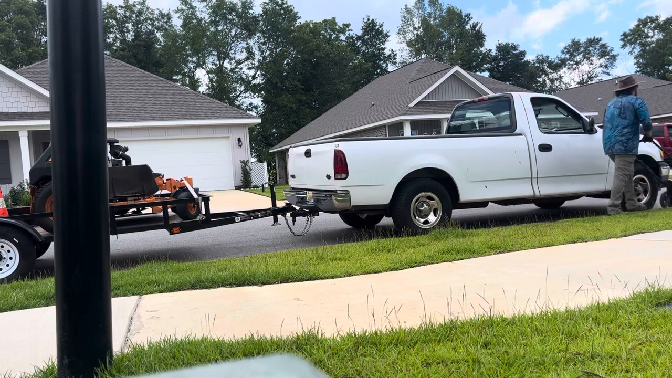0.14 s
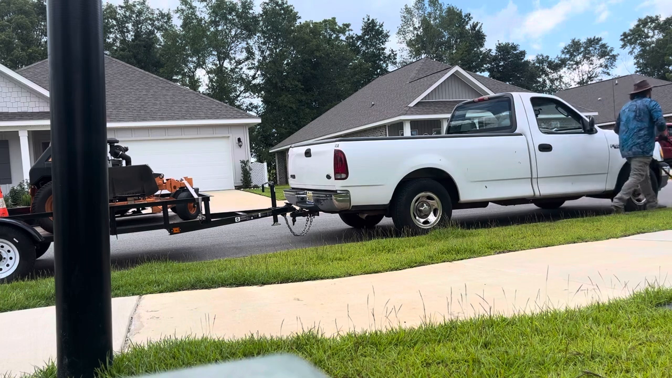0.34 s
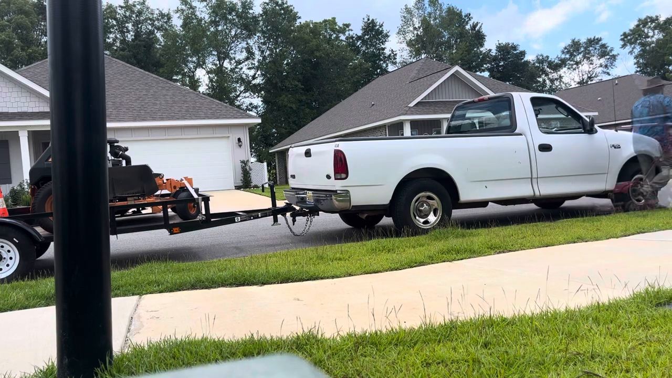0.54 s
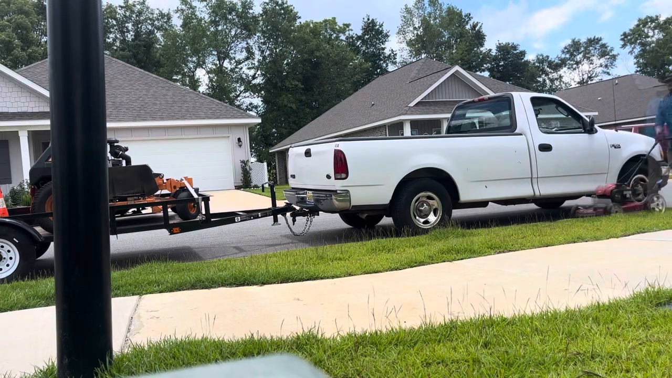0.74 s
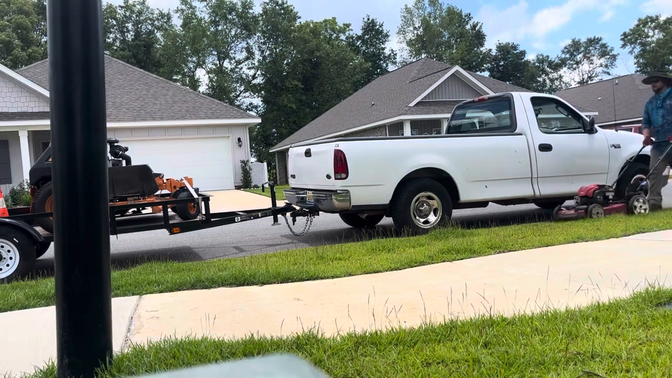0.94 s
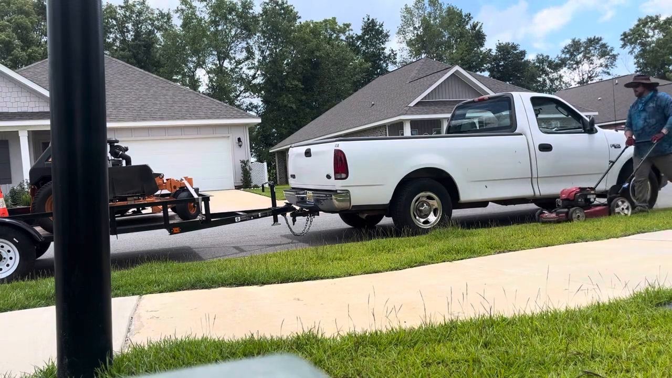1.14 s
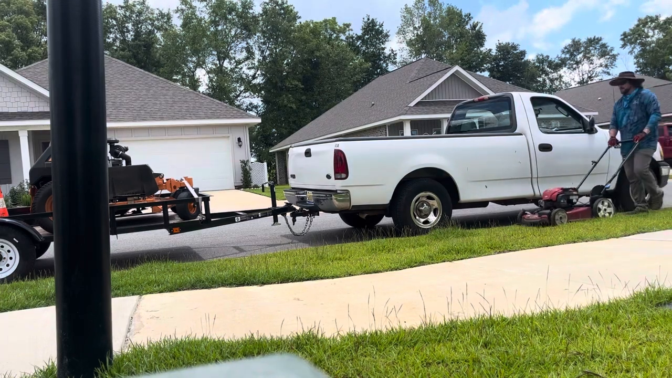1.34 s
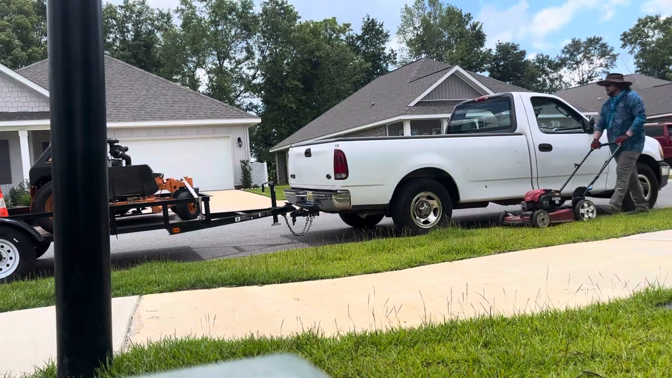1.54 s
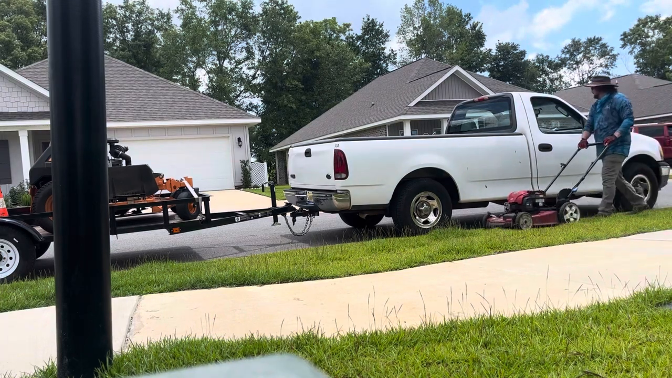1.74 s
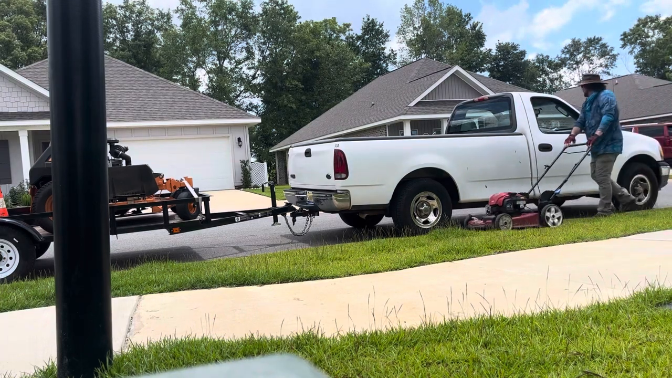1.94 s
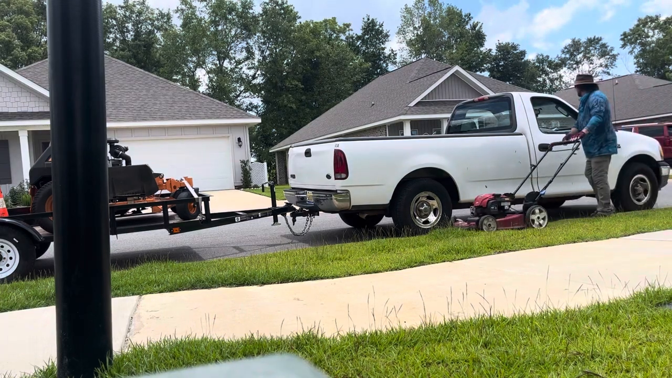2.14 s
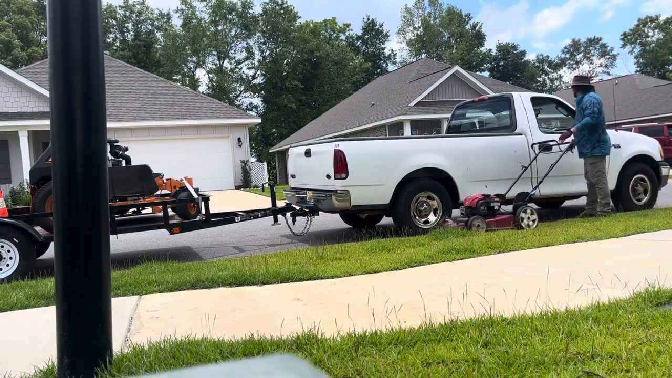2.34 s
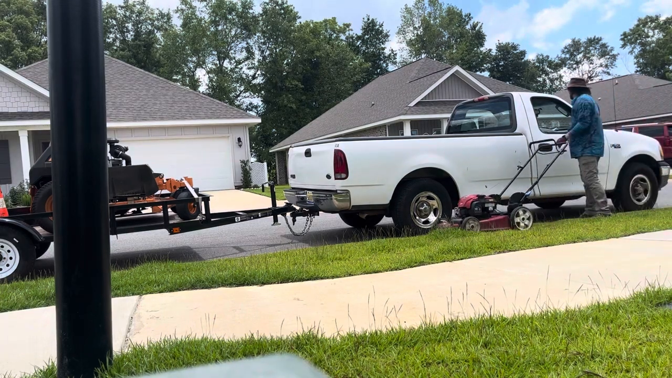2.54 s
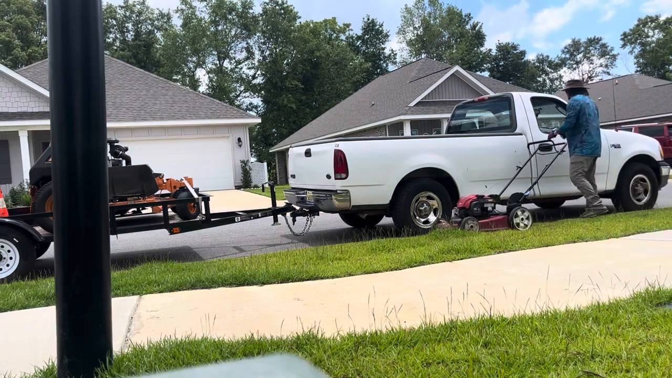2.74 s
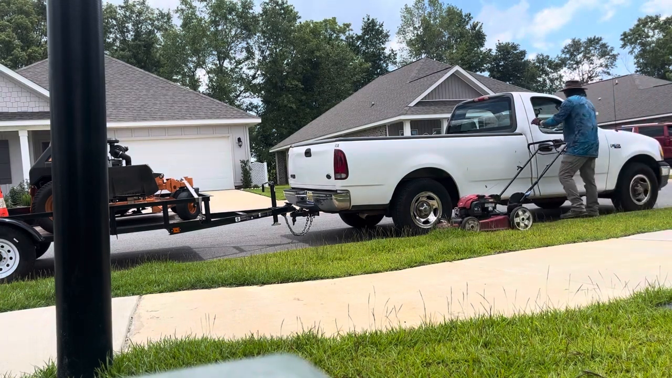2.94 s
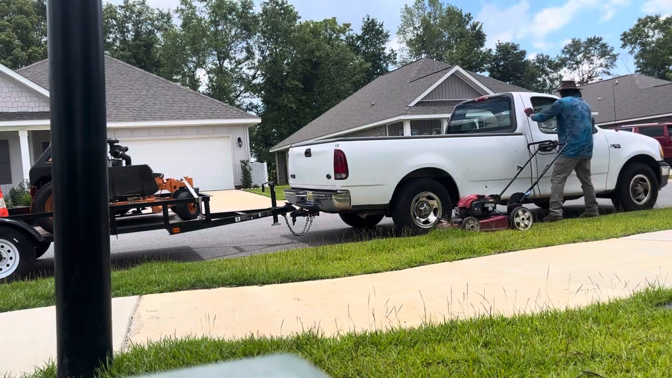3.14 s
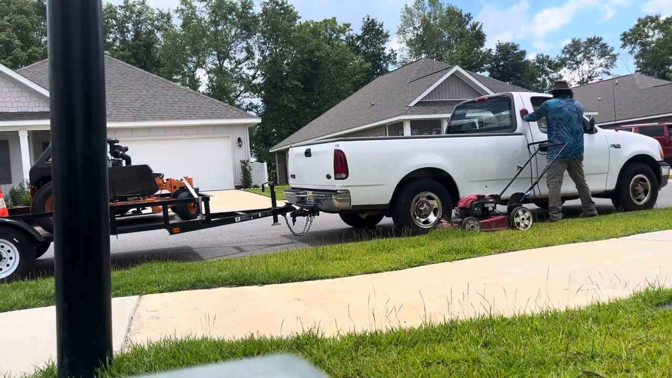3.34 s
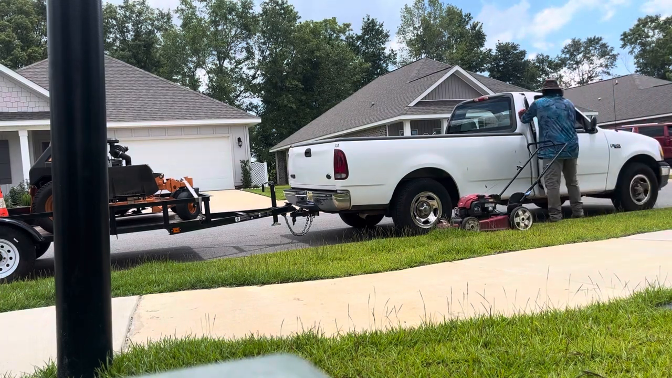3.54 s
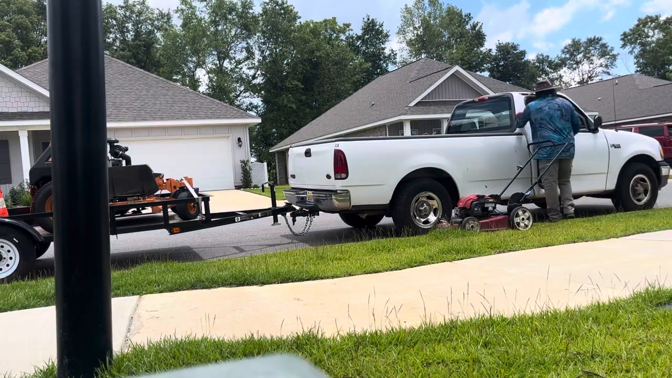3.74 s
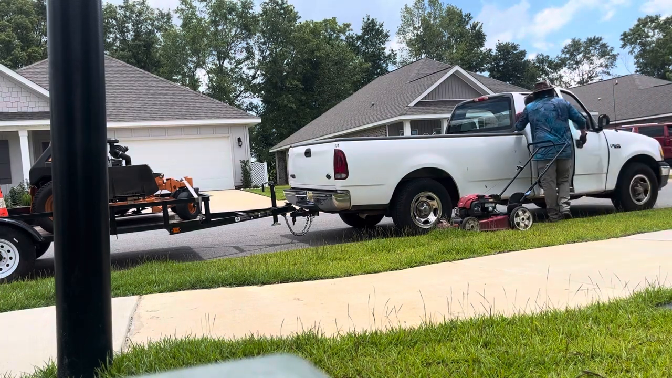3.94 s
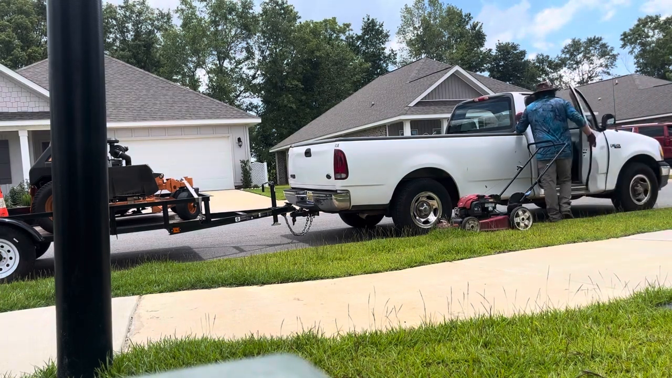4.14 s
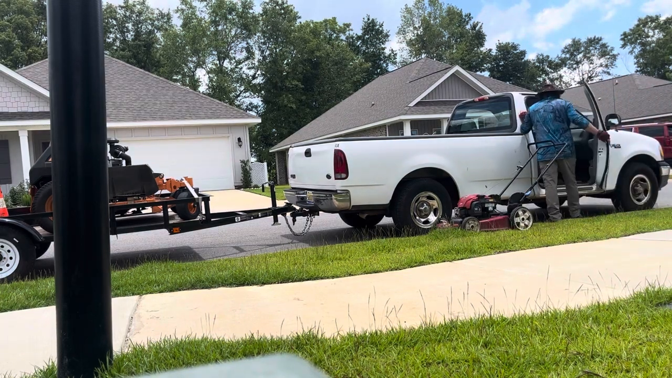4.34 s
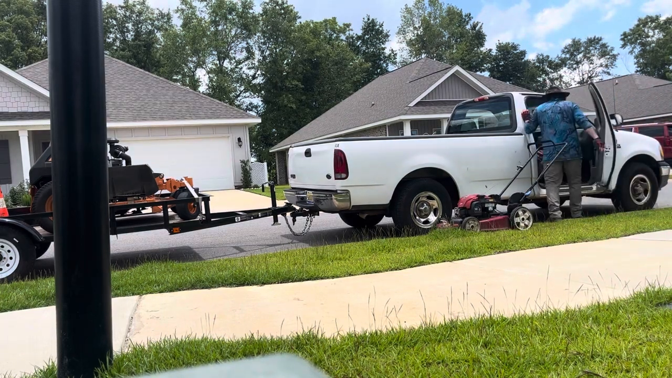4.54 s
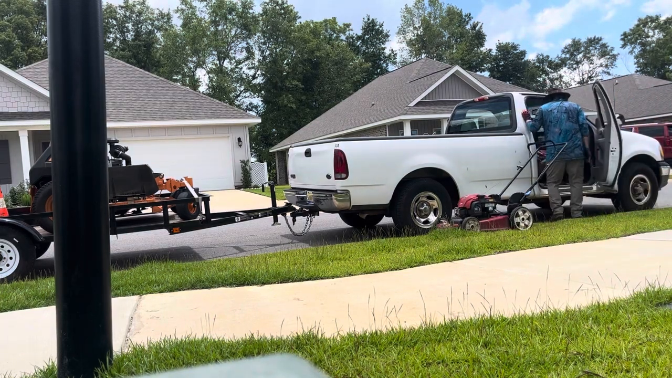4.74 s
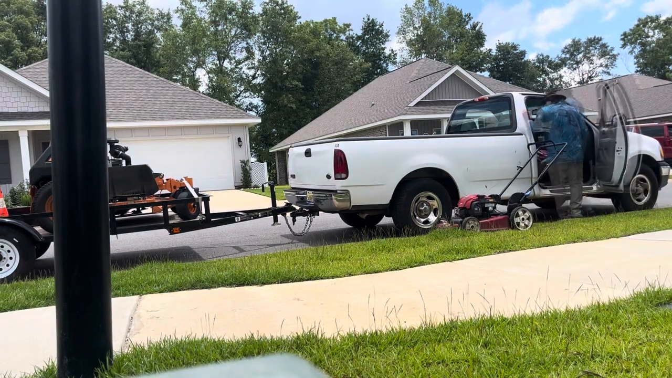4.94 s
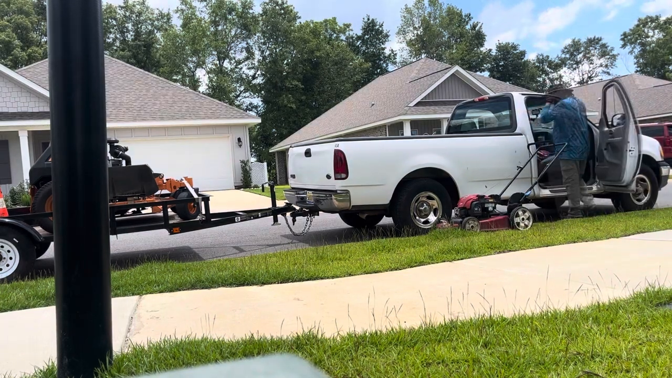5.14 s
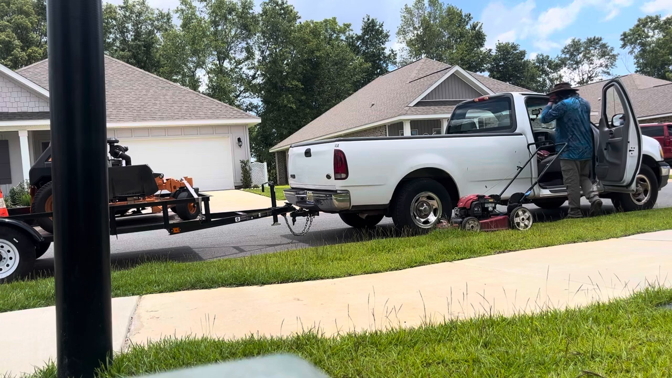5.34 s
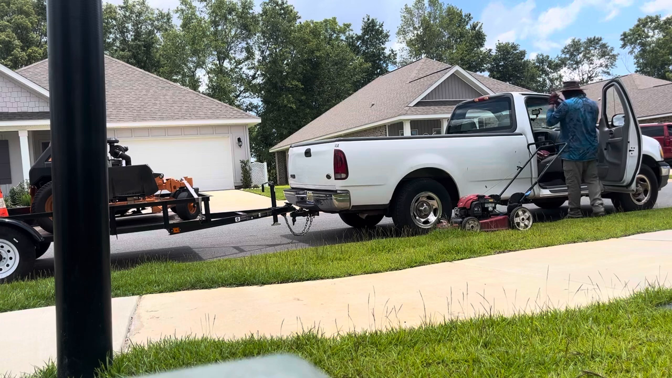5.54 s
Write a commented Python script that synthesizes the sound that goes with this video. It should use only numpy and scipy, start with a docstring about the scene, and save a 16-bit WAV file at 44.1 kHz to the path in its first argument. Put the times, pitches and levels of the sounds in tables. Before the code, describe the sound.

A petrol push mower drones steadily outdoors, is cut off and sputters down to a stop, then a vehicle door latch clicks over quiet street noise.

```python
"""Beside a pickup in the open air: a four-stroke petrol push mower is wheeled out from behind it.
The blade hums in harmonics of the shaft speed, exhaust pulses ring the silencer, noise makes the churned
air, and ticks and chattering guards make the rattle. Then the ignition is cut: thuds, gasps and hollow
pops slow to a stop. The truck's door latch clicks and its panel rings. Under it all lie street noise, the
wavering low drone of a distant engine and a faint trill. A phone's two microphones pick it up."""
import sys
import numpy as np
from scipy import signal
from scipy.fft import rfft, irfft
from scipy.io import wavfile

SR = 44100
rng = np.random.default_rng(int(sys.argv[2]) if len(sys.argv) > 2 else 0)


def store_pcm(level_fs):
    """Save levels as 16-bit WAV."""
    pcm = np.round(np.clip(level_fs, -1, 1) * 32767).astype(np.int16)
    wavfile.write(sys.argv[1], SR, np.atleast_2d(pcm).T)


N = 246513
SIZE = 2 ** 18  # transform length, a power of two that holds the whole scene
T = np.arange(N) / SR
HZ = np.fft.rfftfreq(SIZE, 1 / SR)


def amp(db):
    """Decibels to gain."""
    return np.exp(np.asarray(db) * np.log(10) / 20)


def unit(x):
    """Scales to rms 1."""
    return x / np.sqrt(np.mean(x ** 2) + 1e-20)


def curves(rows):
    """Each column of a time table, at every sample."""
    s, *columns = np.transpose(rows)
    return [np.interp(T, s, c) for c in columns]


def read(points):
    """A frequency table on a log axis, at every bin."""
    f, value = np.transpose(points)
    return np.interp(np.log(HZ + 1), np.log(f + 1), value)


def wander(rate):
    """Random drift of rms 1 that heads for a new value this many times a second."""
    knots = rng.standard_normal(4096)
    return unit(np.interp(T * rate, np.arange(len(knots)), knots))


# how alike noise is at the two microphone ports [pitch_hz, likeness 0-1]
LIKENESS = [(30, .96), (100, .99), (350, .96), (1000, .9), (1700, .76), (2800, .85), (4300, .45),
            (6400, .88), (9000, .95), (15000, .9)]


def noise(spectrum):
    """Coloured noise of rms 1, partly alike at the two ports."""
    a, b = rfft(rng.standard_normal((2, SIZE)))
    same = np.clip(read(LIKENESS), 0, 1)
    pair = np.array([a, same * a + np.sqrt(1 - same ** 2) * b])
    return unit(irfft(pair * amp(read(spectrum)))[:, :N])


def bursts(times, levels_db, rise, fall):
    """Envelope of blows that swell and die away; their powers add."""
    age = np.arange(SR // 2) / SR
    shape = (1 - np.exp(-age / rise)) * np.exp(-age / fall)
    power = np.zeros(N + len(age))
    for s, db in zip(times, levels_db):
        power[round(s * SR):][:len(age)] += (amp(db) * shape / shape.max()) ** 2
    return np.sqrt(power[:N])


def impulses(times, levels_db):
    """One-sample blows at the given times."""
    blows = np.zeros(N)
    blows[np.round(times * SR).astype(int)] = amp(levels_db)
    return blows


def ring(blows, modes, rise):
    """Blows set the modes of a body ringing: decaying sines with a softened onset."""
    age = np.arange(SR // 2) / SR
    body = sum(amp(db - 60 * age / t60) * np.sin(2 * np.pi * (hz * age + rng.random()))
               for hz, db, t60 in modes)
    return signal.oaconvolve(np.atleast_2d(blows), [body * (1 - np.exp(-age / rise))], axes=1)[:, :N]


# tones of the distant engine [pitch_hz, level_db]
DRONE = [(57.5, -50.5), (76, -53.5), (118.4, -55.5), (150.7, -67.5), (188.4, -68.5)]
# colour of the outdoor background [pitch_hz, relative_db per Hz]
STREET = [(15, -43), (38, -5.5), (78, -1.5), (110, -5.5), (250, -13.5), (400, -22.5), (700, -31.5),
          (1500, -36.5), (2300, -40.5), (2900, -47), (4200, -44.5), (5300, -45.5), (7500, -57.5),
          (16000, -56)]
# swell and ebb of the background hiss [time_s, gain_db]
HISS = [(3.5, 1.5), (4.3, 1), (4.5, 2), (4.8, 1.5), (4.97, -2), (5.13, -1.5), (5.25, 1), (5.45, 2),
        (5.58, 2)]


def street(level_db=-49, waver=0.68):
    """Low outdoor rumble, a hiss that swells and ebbs, and a wavering engine far away."""
    drone = 0
    for hz, db in DRONE:
        strength = np.sqrt(2) * (1 + waver * wander(14))
        drone = drone + amp(db) * strength * np.sin(2 * np.pi * hz * T + 0.87 * wander(6.1))
    air = amp(level_db) * noise(STREET)
    rumble = signal.sosfiltfilt(signal.butter(2, 450, fs=SR, output="sos"), air)
    hiss = air - rumble
    return drone + rumble + amp(curves(HISS)[0]) * hiss


# the thin trill [time_s, level_db]
TRILL = [(3.8, -85), (4.28, -82), (4.42, -89), (4.7, -79), (4.95, -80), (5.08, -94), (5.25, -86),
         (5.58, -85)]


def insects():
    """A faint thin trill from the trees: a narrow band of noise."""
    trill_band = [(3500, -50), (4050, -14), (4140, 0), (4250, -14), (4800, -50)]  # pitch_hz, relative_db
    return amp(curves(TRILL)[0]) * noise(trill_band)


# door latch: the catch slips, the door springs free, the handle knocks back [start_s, snap_db, panel_db]
LATCH = [(3.9732, -45, -58.5), (3.9771, -30.5, -33), (3.983, -48, -29), (3.995, -45, -50),
         (4.006, -53, -42), (4.079, -63, -55)]
# colour of the latch's snap [pitch_hz, relative_db per Hz]
SNAP = [(200, -1), (800, 2), (1500, 2), (3000, -4.5), (5000, -2.5), (8000, -10), (11000, -17), (16000, -27)]
# rods inside the door [pitch_hz, relative_db per Hz]
LINKAGE = [(100, -18), (250, 13.5), (550, 0.5), (800, -7), (1200, -13), (1600, -10), (2200, -17),
           (3000, -25), (4500, -27), (6500, -23), (16000, -45)]
# modes of the door panel [pitch_hz, relative_db, t60_s]
DOOR = [(168, -3, 0.1), (203, -2.5, 0.13), (252, 1.5, 0.1), (292, -1, 0.08), (360, -5, 0.06),
        (456, -4, 0.12), (520, -7, 0.08), (620, -9, .06), (770, -11, .06), (890, -18, 0.05),
        (1184, -24, .06), (1400, -17, .06), (1520, -17, 0.05), (1860, -21, .05)]


def door(shudder_db=-8, rattle_db=3.0):
    """The latch snaps, the linkage rattles unevenly and the door panel rings."""
    s, snap_db, panel_db = np.transpose(LATCH)
    snap = bursts(s, snap_db, rise=0.00037, fall=0.0032) * noise(SNAP)
    rattle = unit(amp(rattle_db * wander(220)))
    shudder = bursts(s, panel_db + shudder_db, rise=0.0021, fall=0.04) * rattle * noise(LINKAGE)
    return ring(impulses(s, panel_db), DOOR, rise=0.0043) + snap + shudder


# crankshaft speed as the governor holds it; the blade shares the shaft [time_s, speed in turns a second]
CRANK = [(0.0, 47.0), (0.09, 46.6), (0.35, 46.6), (0.8, 47.2), (1.03, 47.3), (1.19, 46.6), (1.54, 46.8),
         (1.62, 47.4), (1.93, 46.9), (2.29, 47.1)]
# after the ignition cut, drag in step with the speed and a steady friction brake the shaft
CUT_S, FULL_TURNS_PER_S, DRAG_S, FRICTION_TURNS_PER_S2 = 2.29, 47, 2.78, 31


def crank():
    """Shaft speed and turns counted from the cut: governed at first, then coasting to rest."""
    friction = FRICTION_TURNS_PER_S2 * DRAG_S
    coasting = (FULL_TURNS_PER_S + friction) * np.exp(-(T - CUT_S) / DRAG_S) - friction
    speed = np.where(T < CUT_S, curves(CRANK)[0], coasting)
    speed = np.maximum(speed, 0) * (1 + .002 * wander(30))
    turns = np.cumsum(speed) / SR
    return speed, turns - np.interp(CUT_S, T, turns)


def halvings(speed):
    """How many times the shaft's speed has halved from full."""
    return np.log2(FULL_TURNS_PER_S / np.clip(speed, .5, FULL_TURNS_PER_S))


# the mower clears the truck's nose, then keeps coming closer until the cut
EMERGE_S, APPROACH_DB_PER_S = 0.76, 0.95


def hidden(emerge_s):
    """Near 1 while the truck screens the mower, near 0 once it is in the open."""
    return .5 - .5 * np.tanh((T - EMERGE_S) / emerge_s)


def reach(speed, open_db, hidden_db, halving_db, emerge_s):
    """Level of one part: altered behind the truck, louder as it nears, weaker with each halving of speed."""
    nearing_db = APPROACH_DB_PER_S * np.minimum(T - CUT_S, 0)
    return open_db + hidden_db * hidden(emerge_s) + nearing_db + halving_db * halvings(speed)


def each_cycle(turns, place, uneven_db):
    """One impulse every second turn, at a set place in the cycle, of random strength."""
    due = np.diff(np.floor(turns / 2 - place), prepend=-1) > 0
    return due * amp(uneven_db * (2 * rng.random(N) - 4.5))


def strokes(turns, speed, place, level_db, halving_db, uneven_db=3):
    """Times and levels of a sound once a cycle after the cut, uneven and weaker as the shaft slows."""
    due = (np.diff(np.floor(turns / 2 - place), prepend=0) > 0) & (T > CUT_S)
    levels_db = level_db + halving_db * halvings(speed) + uneven_db * (2 * rng.random(N) - 1)
    return T[due], levels_db[due]


# air churned under the deck [pitch_hz, relative_db per Hz]
AIR = [(22, -32), (45, -14), (80, -8), (170, -7), (300, -3), (480, -2), (600, -2.5), (760, -5.5),
       (960, -9.5), (1130, -6), (1300, -14), (1500, -16.5), (3000, -33), (8000, -60)]
PUFF_DEPTH, RASP_DB = .38, 2.6  # depth of the blade's puffs (0-1), grain of the churned air (dB)


def deck_air(turns, level_db, gust_db=0.4):
    """A puff of turbulence follows each blade tip."""
    puffs = unit(1 + PUFF_DEPTH * np.cos(2 * np.pi * 2 * turns))
    rasp = unit(amp(RASP_DB * wander(420)))
    return amp(level_db + gust_db * wander(29.86)) * puffs * rasp * noise(AIR)


# short squeaks of the thin guard [start_s, level_db]
SQUEAKS = [(0.236, -36.5), (0.279, -41), (0.322, -47), (0.492, -47), (0.578, -46)]
SQUEAK_HZ, SQUEAK_SAG_HZ, SQUEAK_S = 2265, 59.5, 0.0054  # pitch, its fall as the squeak dies, time to peak


def squeaks():
    """Now and then the thin guard slips on its bolt with a short, falling chirp."""
    out = np.zeros(N)
    for s, db in SQUEAKS:
        age = np.maximum(T - s, 0) / SQUEAK_S
        hz = SQUEAK_HZ - SQUEAK_SAG_HZ * (1 - np.exp(-age / 2))
        swell = (age * np.exp(1 - age)) ** 2
        out += amp(db) * swell * np.sqrt(2) * np.sin(2 * np.pi * np.cumsum(hz) / SR)
    return out


# valve gear and loose metal [pitch_hz, relative_db per Hz]
METAL = [(200, -1.5), (700, -0.5), (1500, -5), (2100, -2), (3000, 1.5), (3600, -1.5), (4150, -4.5),
         (4600, -5), (5400, -5), (6500, -4), (9300, -1.5), (11500, -4.5), (12600, -12), (15800, -9.5)]
# ticks within one four-stroke cycle [place 0-1, relative_db]
VALVES = [(.14, -1), (.55, 0), (.83, -1.5)]
# jolts of the deck and handle [start_s, level_db]
RATTLES = [(1.503, -39.5), (1.975, -33.5), (2.023, -38), (2.287, -30), (2.372, -33.5), (2.407, -38),
           (3.137, -54), (3.154, -41), (3.165, -69)]
# fading time of a tick in cycles, steady hiss beside the ticks, their spread (dB)
TICK_CYCLES, TICK_WASH, TICK_UNEVEN_DB = .065, .62, 2


def clatter(turns, level_db, uneven_db=0.27):
    """Valve gear ticks three times a cycle; jolts shake the loose metal harder."""
    ticks = 0
    for place, db in VALVES:
        since_tick = (turns / 2 - place) % 1
        ticks = ticks + amp(db + TICK_UNEVEN_DB * wander(24)) * np.exp(-since_tick / TICK_CYCLES)
    running = amp(level_db) * unit(TICK_WASH + ticks)
    jolts = bursts(*np.transpose(RATTLES), rise=.002, fall=.015)
    return (running + jolts) * unit(amp(uneven_db * wander(350))) * noise(METAL)


# modes of the thin guard [pitch_hz, relative_db, t60_s]
GUARD = [(2280, -4, .032), (3620, -11.5, .022), (3900, -10, .02), (4210, -7, .026), (4490, -6, .022),
         (4830, -5.5, .022)]
# modes of the heat shield [pitch_hz, relative_db, t60_s]
SHIELD = [(1730, -10, 0.045), (2000, -3.5, 0.021), (2444, 4.5, 0.014), (2750, 6.5, 0.01),
          (3060, 1.5, 0.014), (4167, -8, 0.025), (4350, -4, 0.012), (4580, -5, .012), (4820, -9, 0.02),
          (4970, -12, .025), (7900, -6, 0.022)]
# moments when the heat shield buzzes harder [centre_s, half_length_s, level_db]
FLARES = [(1.02, 0.056, -48.5), (1.364, 0.075, -53.5), (1.636, 0.081, -54)]
CHATTER_S, GUARD_RUB = .009, .15  # fading time of each chatter, the thin guard's steady contact beside it
GUARD_PLACE, SHIELD_PLACE = .78, .53  # where each chatters within the cycle (0-1)


def tin_buzz(turns, speed, uneven_db=4.5):
    """The loose guards chatter on their bolts, each at its own point of the cycle, now and then harder."""
    def contact(place):
        fade = np.exp(-1 / (CHATTER_S * SR))
        return signal.lfilter([1], [1, -fade], each_cycle(turns, place, uneven_db))
    guard = amp(reach(speed, open_db=-57.5, hidden_db=9, halving_db=-43.5, emerge_s=0.23))
    shield = amp(reach(speed, open_db=-49.0, hidden_db=-8.5, halving_db=-32, emerge_s=0.1))
    shield = shield + sum(amp(db) * np.exp(-((T - s) / flare_s) ** 2) for s, flare_s, db in FLARES)
    guard_ring = ring((contact(GUARD_PLACE) + GUARD_RUB) * noise(METAL), GUARD, rise=0.0016)
    shield_ring = ring(contact(SHIELD_PLACE) * noise(METAL), SHIELD, rise=0.0013)
    return guard * unit(guard_ring) + shield * unit(shield_ring)


# silencer response [pitch_hz, open_relative_db, behind_truck_relative_db]
MUFFLER = [(23, -30, -30), (47, -15, -12), (70, -14, -18), (117, 0, 0), (141, -4.5, -3), (165, -19, -23),
           (211, -7, -20), (235, -13, -21), (258, -7.5, -20), (305, -16, -25), (330, -17, -14),
           (430, -12, -14), (500, -15, -15), (600, -18, -18), (700, -24, -25), (880, -28, -27),
           (1100, -33, -37), (2500, -60, -60)]
# level of the exhaust before it weakens with speed [time_s, level_db]
EXHAUST = [(0.05, -31.5), (0.5, -32), (0.72, -33), (1.0, -29), (1.55, -27.5), (2.0, -28), (2.31, -29),
           (2.4, -31)]
EXHAUST_HALVING_DB = -17  # change with each halving of speed
FIRING_JITTER_TURNS, FIRING_UNEVEN_DB = .012, 3.2  # how far each pulse strays, spread of their strengths


def exhaust(turns, speed, level_db=0.0, place=.14):
    """A pulse each cycle rings the silencer, whose chambers hold back the higher pitches by differing times."""
    held_back_s = .011 * (1 - np.cos(2 * np.pi * HZ / 310)) * np.clip(HZ / 250 - 1, 0, 1)
    pulses = each_cycle(turns + FIRING_JITTER_TURNS * wander(24), place, FIRING_UNEVEN_DB)
    # summing the delay over frequency gives the phase
    pulses = rfft(pulses, SIZE) * np.exp(-2j * np.pi * np.cumsum(held_back_s) * SR / SIZE)

    def heard(column):
        # folding the cepstrum puts the silencer's response after each pulse, never before it
        cepstrum = irfft(np.log(amp(read(np.array(MUFFLER)[:, [0, column]]))))
        return unit(irfft(pulses * np.exp(rfft(2 * cepstrum[:SIZE // 2], SIZE)))[:N])
    behind = hidden(emerge_s=0.17)
    level = amp(level_db + curves(EXHAUST)[0] + EXHAUST_HALVING_DB * halvings(speed))
    return level * ((1 - behind) * heard(1) + behind * heard(2))


# gasps of the coasting engine [start_s, length_s, hiss_db, rush_db]
CHUFFS = [(2.327, 0.031, -34, -42), (2.415, .016, -31, -33), (2.465, 0.021, -37.5, -36.5),
          (2.51, 0.042, -37, -38), (2.574, 0.017, -36.5, -41), (2.635, 0.024, -37.5, -37.5),
          (2.706, .023, -38.5, -40.5), (2.777, 0.025, -39.5, -41), (2.863, 0.031, -45, -42.5),
          (2.96, 0.04, -48.5, -46), (3.08, 0.048, -52.5, -51), (3.269, .055, -58.5, -55)]
# air forced through the carburettor [pitch_hz, relative_db per Hz]
RUSH = [(150, -6), (400, 2), (750, 0.5), (1100, -9), (1500, 1.5), (2200, -8), (3200, -2), (4500, -18.5),
        (6000, -27), (12000, -44)]


def chuffs(rise=0.005, grain_db=3.0):
    """Each gasp opens quickly, holds while the valve is open and shuts off: gritty hiss over a rush of air."""
    hiss, rush = np.zeros((2, N))
    for s, length, hiss_db, rush_db in CHUFFS:
        age = np.maximum(T - s, 0)
        gasp = (1 - np.exp(-age / rise)) * np.exp(-(age / length) ** 4)
        hiss = hiss + amp(hiss_db) * gasp
        rush = rush + amp(rush_db) * gasp
    return unit(amp(grain_db * wander(550))) * (hiss * noise(METAL) + rush * noise(RUSH))


# air pumped by the piston [pitch_hz, relative_db per Hz]
PUMP = [(22, -34), (45, -45), (80, -3), (160, -3.5), (240, -10.5), (340, -14.5), (460, -12), (650, -21),
        (1200, -29), (2000, -31), (5000, -47)]
# air box and cylinder, struck by each compression [pitch_hz, relative_db, t60_s]
AIRBOX = [(58, 11, 0.078), (83.5, 11, 0.056), (120, 2, 0.039), (222, 8, 0.064), (393, -9, 0.048),
          (526, -14, 0.096)]
# hollow pops as the exhaust valve opens on an unfired charge [start_s, level_db]
POPS = [(2.432, -25.5), (2.483, -25.5), (2.541, -28), (2.597, -27.5), (2.664, -28.5), (2.732, -32),
        (2.808, -31.5), (2.898, -32.5), (3.005, -35.5)]
# modes of the exhaust pipe that the pops excite [pitch_hz, relative_db, t60_s]
PIPE = [(458, 9.5, 0.055), (525, 0, 0.036), (600, -4, .03)]
# the gas that escapes with each pop [pitch_hz, relative_db per Hz]
GUST = [(120, -14), (300, -4), (480, 3), (620, -9.5), (850, -10.5), (1500, -19), (4000, -33), (10000, -60)]
INTAKE_PLACE = .6  # where the coasting engine draws air within one cycle (0-1)


def run_down(turns, speed, gust_db=-10):
    """Without a spark each cycle gives a thud and a puff of air, joined by timed gasps and hollow pipe pops."""
    puff = bursts(*strokes(turns, speed, INTAKE_PLACE, level_db=-31, halving_db=-5), rise=0.017, fall=0.052)
    thud = impulses(*strokes(turns, speed, INTAKE_PLACE, level_db=-25.5, halving_db=-7))
    s, pop_db = np.transpose(POPS)
    gust = bursts(s, pop_db + gust_db, rise=0.005, fall=0.0081) * noise(GUST)
    pops = ring(impulses(s, pop_db), PIPE, rise=0.0032) + gust
    return chuffs() + puff * noise(PUMP) + ring(thud, AIRBOX, rise=0.0038) + pops


# the last slow compressions [start_s, level_db]
THUMPS = [(3.039, -34), (3.218, -27), (3.394, -34), (3.44, -38)]
# the hollow body that they strike [pitch_hz, relative_db, t60_s]
CYLINDER = [(66, 1.5, 0.074), (107, 0, 0.038), (150, -7, 0.057), (234, -4, 0.075)]
# the jerk that sets the blade ringing as the shaft comes to rest [start_s, level_db]
LAST_JERK = [(3.386, -46.5)]
# faint ring of the blade [pitch_hz, relative_db, t60_s]
BLADE_RING = [(900, 0, 0.26)]


def last_rebound(s=3.398, swell_s=0.028, leak_s=0.055, hiss_db=-66.0, puff_db=-35.0):
    """The piston labours over its last compressions, then bounces back with a soft puff; the blade rings."""
    leak = np.exp(-abs(T - s) / leak_s) * (T < s + leak_s + leak_s)
    puff = 1 / np.cosh(np.clip((T - s) / swell_s, -20, 20)) ** 2
    air = amp(hiss_db) * leak * noise(METAL) + amp(puff_db) * puff * noise(PUMP)
    thumps = ring(impulses(*np.transpose(THUMPS)), CYLINDER, rise=0.0036)
    return air + thumps + ring(impulses(*np.transpose(LAST_JERK)), BLADE_RING, rise=0.0022)


# the blade's fundamental, before trim and slowing [time_s, relative_db]
FIRST = [(0.05, -31), (0.3, -33.5), (0.72, -26), (0.97, -20.5), (1.65, -21), (2.15, -20.5), (2.35, -21)]
# its second harmonic, which swells and fades as the mower moves [time_s, relative_db]
SECOND = [(0.06, -25), (0.33, -35), (0.97, -17), (1.21, -20), (1.47, -14.5), (1.61, -24.5), (2.15, -19),
          (2.22, -27), (2.45, -22.5), (2.8, -24.5)]
# its third harmonic [time_s, relative_db]
THIRD = [(0.06, -34), (0.55, -32.5), (0.69, -43), (1.39, -30.5), (1.57, -39.5), (1.66, -27.5), (2.24, -28),
         (2.35, -26.5), (2.5, -29)]
# its fourth harmonic [time_s, relative_db]
FOURTH = [(0.1, -38), (0.7, -38), (1.1, -36.5), (1.45, -28), (1.58, -44), (1.75, -28), (1.9, -45),
          (2.1, -32.5), (2.38, -43.5)]
# unsteadiness of these four in the churned air [flutter 0-1, one entry a harmonic]
FLUTTER = [.07, .15, .3, .36]
# shaft imbalance and weaker overtones [multiple of crank speed, open_relative_db, behind_truck_relative_db]
OVERTONES = [(1, -42, -46), (10, -41, -43), (12, -42.3, -41), (14, -46.5, -51), (16, -47, -48),
             (18, -55, -50), (20, -58, -56), (24, -57, -66)]
# change at one halving of speed, and level of the weaker overtones together
FIRST_HALVING_DB, SECOND_HALVING_DB, THIRD_HALVING_DB, FOURTH_HALVING_DB = -25, -14, -17, -12
BUZZ_DB = 0.5


def blade(turns, speed, first_db=0.5, second_db=-1.0, third_db=3.0, fourth_db=0.0):
    """Two blade tips pass the chute each turn; the harmonics swell and fade as it moves, and die as it slows."""
    def tone(order, drift=0):
        return np.sqrt(2) * np.cos(2 * np.pi * order * turns + drift)
    slowed = halvings(speed)
    steeper = slowed * np.sqrt(slowed)
    levels_db = [curves(FIRST)[0] + first_db + FIRST_HALVING_DB * slowed,
                 curves(SECOND)[0] + second_db + SECOND_HALVING_DB * steeper,
                 curves(THIRD)[0] + third_db + THIRD_HALVING_DB * steeper,
                 curves(FOURTH)[0] + fourth_db + FOURTH_HALVING_DB * slowed]
    hum = 0
    for k, db in enumerate(levels_db):
        harmonic = tone(2 * (k + 1), FLUTTER[k] * wander(20))
        hum = hum + amp(db) * harmonic * (1 + FLUTTER[k] * wander(35.92))
    buzz = 0
    for order, open_db, behind_db in OVERTONES:
        level = amp(reach(speed, open_db, behind_db - open_db, halving_db=-7, emerge_s=.1))
        buzz = buzz + level * tone(order, .55 * wander(22)) * (1 + .4 * wander(18))
    return -hum - amp(BUZZ_DB) * buzz


# echo decay off house fronts and trees [pitch_hz, t60_s]
ECHO = [(150, 0.94), (400, 0.65), (1040, 0.56), (2760, 0.53), (7280, 0.096)]


def yard(x, wet_db=-15, delay=.018):
    """Scattered echoes from houses and trees; the bass comes back weakly."""
    taps = rng.standard_normal((2, SR // 2)) * (rng.random((2, SR // 2)) < .05)
    hz, t, z = signal.stft(taps, SR, nperseg=256)
    t60 = np.interp(hz, *np.transpose(ECHO))
    tail = signal.istft(z * amp(-60 * t / t60[:, None]) * (t > delay), SR, nperseg=256)[1]
    tail = signal.sosfilt(signal.butter(2, 260, "high", fs=SR, output="sos"), tail)
    return x + amp(wet_db) * signal.fftconvolve(x, tail / np.linalg.norm(tail[0]), axes=1)[:, :N]


# level difference of the two microphone ports [pitch_hz, left_minus_right_db]
BALANCE_DB = [(110, .8), (350, -2.2), (800, -3.4), (1700, -1.5), (2200, -4), (3000, -2.8), (4300, -6.3),
              (5700, -.5), (8000, 0)]
# phase difference of the two ports [pitch_hz, left_lead in radians]
LEAD = [(0, 0), (650, -.6), (1500, -.45), (3500, -1.5), (5000, .5), (5700, 2.6), (7100, 3.6), (7800, 5.9),
        (10000, 6.7), (11700, 9), (13700, 9.7), (14700, 11.8), (15800, 12.5)]


def ports(x):
    """Level and phase differences between the phone's two microphones, half given to each side."""
    half = amp(read(BALANCE_DB) / 2) * np.exp(.5j * np.interp(HZ, *np.transpose(LEAD)))
    taps = np.roll(irfft(np.array([half, 1 / half])), 256, axis=1)[:, :513] * np.hanning(513)
    return signal.oaconvolve(x, taps, "same", axes=1)


def scene():
    """The crank drives the running mower; its run-down, the door, the street and the trill join it."""
    speed, turns = crank()
    air_db = reach(speed, open_db=-31.5, hidden_db=-9.0, halving_db=-24, emerge_s=0.065)
    metal_db = reach(speed, open_db=-37.5, hidden_db=-6.5, halving_db=-13.5, emerge_s=0.11)
    mower = blade(turns, speed) + exhaust(turns, speed) + deck_air(turns, air_db)
    mower = mower + clatter(turns, metal_db) + tin_buzz(turns, speed) + squeaks()
    # a 4 ms fade-in, and silence once the shaft stands still
    turning = np.minimum(speed / 2, np.minimum(T / .004, 1))
    near = turning * mower + run_down(turns, speed) + last_rebound() + door()
    return ports(yard(near)) + street() + insects()


LOW_CUT_HZ, EDGE_HZ = 36, 15850


def record(dry):
    """The phone's rumble filter and band limit."""
    dry = signal.sosfilt(signal.butter(4, LOW_CUT_HZ, "high", fs=SR, output="sos"), dry)
    return signal.oaconvolve(dry, signal.firwin(511, EDGE_HZ, window=("kaiser", 9), fs=SR)[None], "same")


dry = scene()
out = record(dry)
store_pcm(out)
```